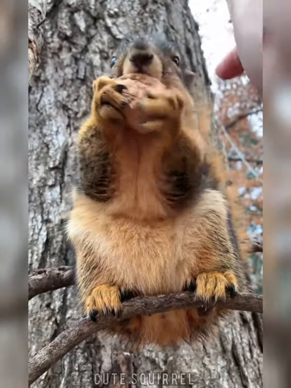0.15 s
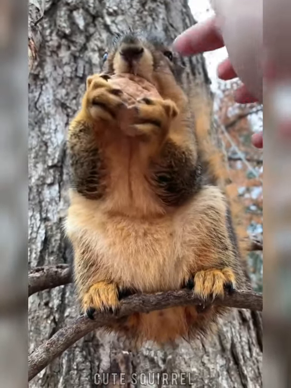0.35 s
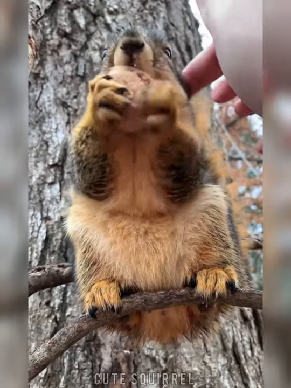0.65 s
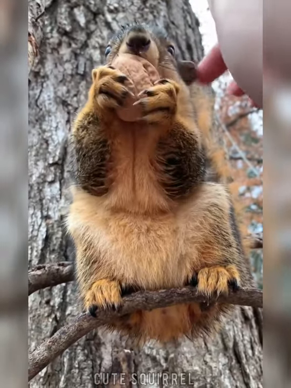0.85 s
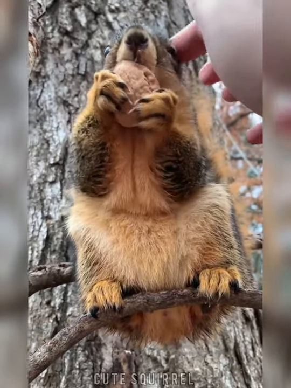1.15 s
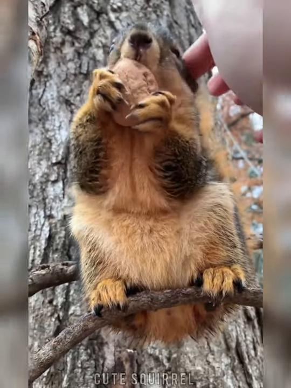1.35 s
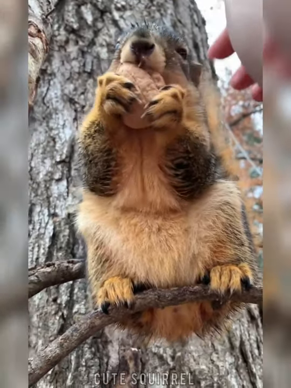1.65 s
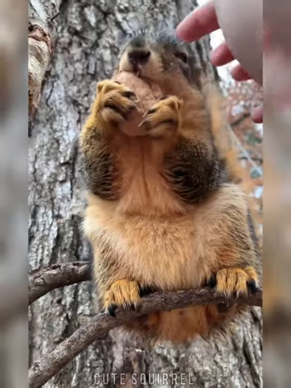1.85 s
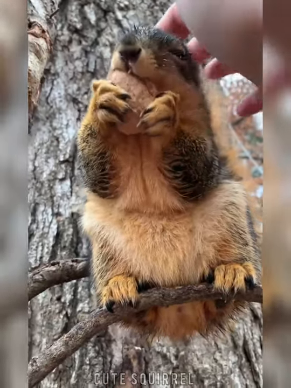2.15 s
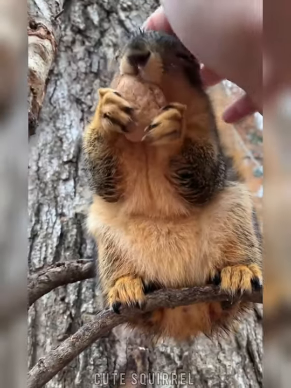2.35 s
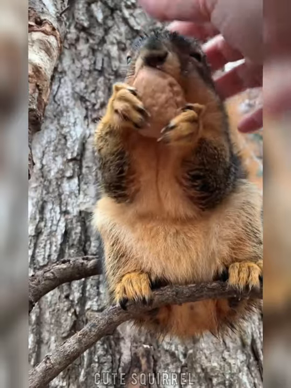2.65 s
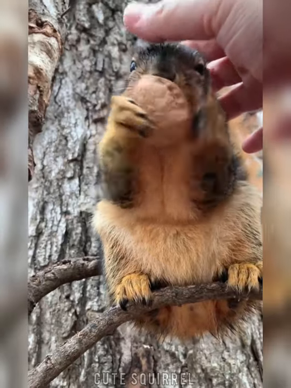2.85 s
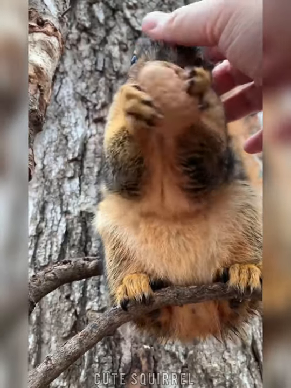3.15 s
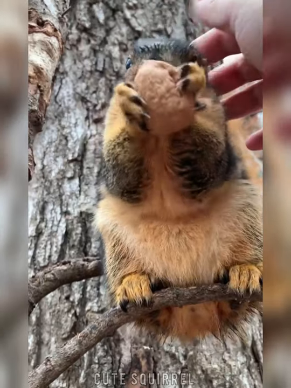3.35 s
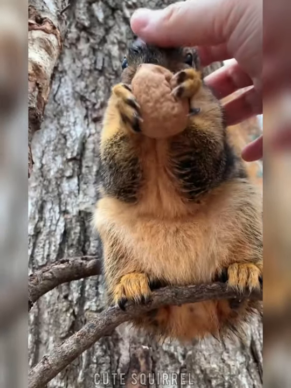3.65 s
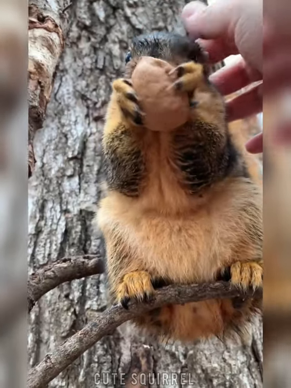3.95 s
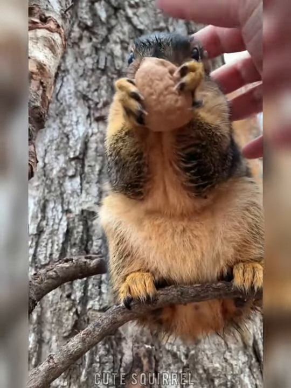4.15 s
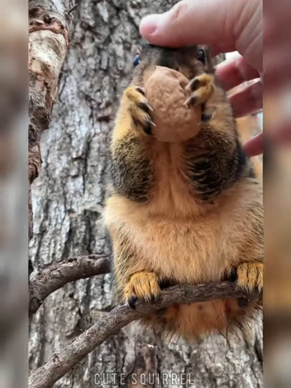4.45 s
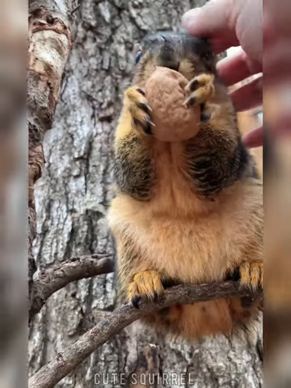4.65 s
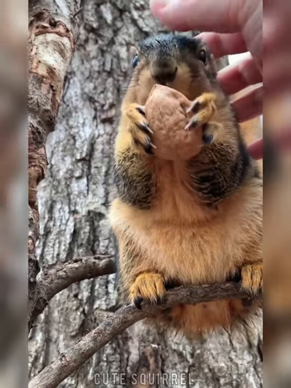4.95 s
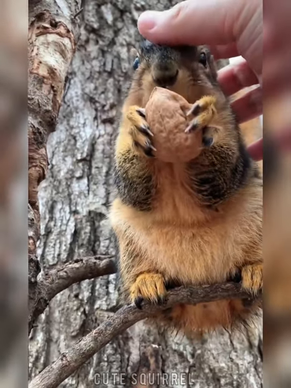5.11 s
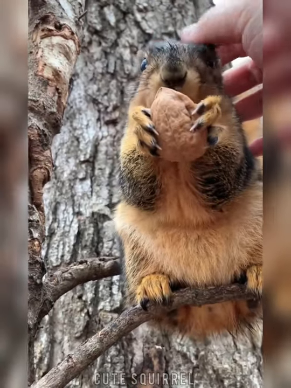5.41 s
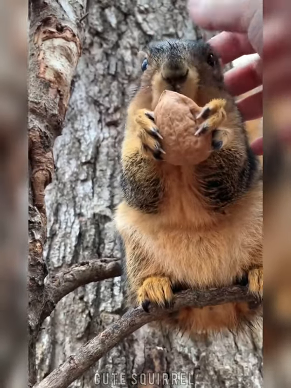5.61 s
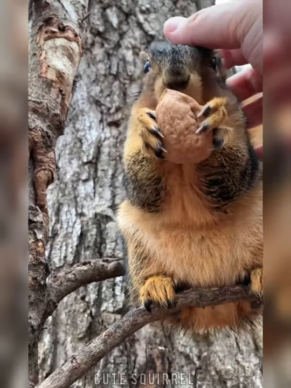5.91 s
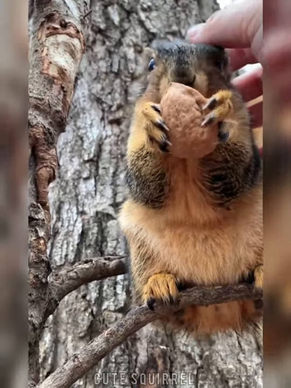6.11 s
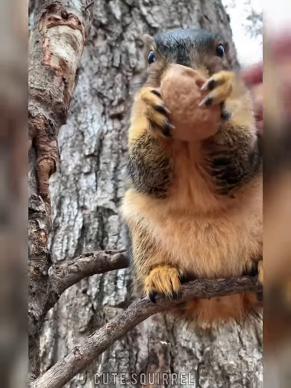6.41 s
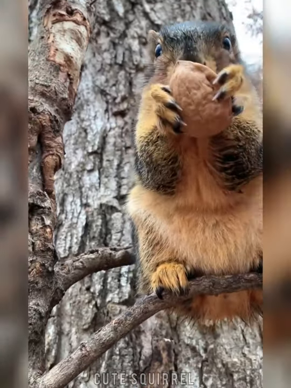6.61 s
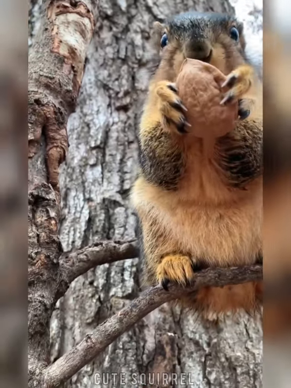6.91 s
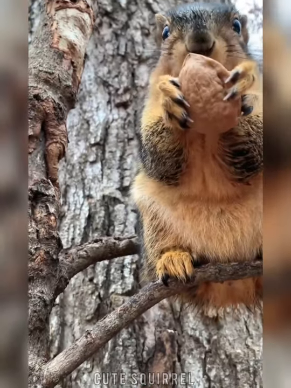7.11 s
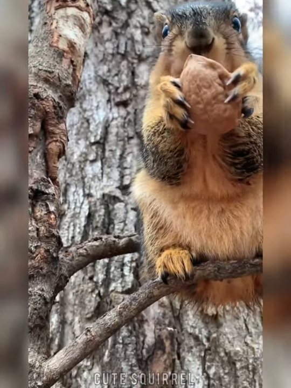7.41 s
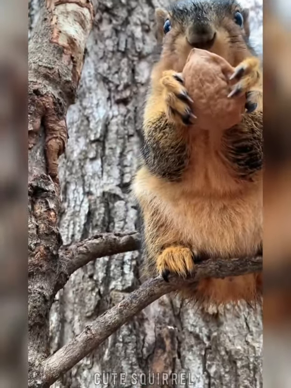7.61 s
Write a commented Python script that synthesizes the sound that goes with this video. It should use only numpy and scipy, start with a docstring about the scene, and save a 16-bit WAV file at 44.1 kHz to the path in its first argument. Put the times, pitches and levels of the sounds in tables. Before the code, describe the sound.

Very close, a squirrel's teeth rasp and knock on a hard walnut shell outdoors. Quick woody taps and scrapes crowd the first two seconds, then bright chips snap, sharpest just after three seconds. Later bites come in sparse clusters with quieter nibbling between them, fading to faint ticks. A low, far traffic rumble runs throughout, swelling slightly near the middle. The sound is dry, with hardly any echo.

```python
"""Teeth grind and nibble close by, over a low rumble like far traffic: a squirrel gnaws a walnut outdoors.
The harder bites knock, scrape and snap off tiny chips. The distant roar swells a little near the middle.
The background is shaped noise. Grinding and scraping are dense random pulses, flakes are short rings,
knocks are decaying sine tones of the shell, and chips are very short bursts of noise."""
import sys
import numpy as np
from scipy import signal
from scipy.fft import rfft, irfft
from scipy.io import wavfile
from scipy.ndimage import uniform_filter1d, map_coordinates

SR = 44100
rng = np.random.default_rng(int(sys.argv[2]) if len(sys.argv) > 2 else 0)


def file_out(sig):
    """Save sig as 16-bit WAV at sys.argv[1]."""
    # one column per channel
    cols = np.atleast_2d(sig).T
    # limit, then scale
    lim = np.clip(cols, -1, 1)
    pcm = np.round(lim * 32767).astype(np.int16)
    wavfile.write(sys.argv[1], SR, pcm)


N = 342688

# spectrum of the distant roar: pitch_hz, level_db (per Hz, relative)
RUMBLE_COLOUR = [(24, -19), (38, -9.5), (52, 1.5), (72, -1), (88, 0.5), (108, -4), (155, -8.5), (205, -16),
                 (265, -12.5), (370, -20), (600, -29.5), (1200, -36.5), (3000, -102)]
# spectrum of the still air: pitch_hz, level_db (per Hz, relative)
AIR_COLOUR = [(150, 2.5), (500, 7), (900, 6), (1300, 0), (2000, -5), (3000, -8.5), (4200, -13), (5200, -46),
              (6600, -20.5), (9000, -20), (11500, -32), (16000, -27)]
# loudness of the far traffic: time_s, level_db
TRAFFIC_LEVEL = [(0, -36.5), (.8, -36), (3.5, -35.5), (3.75, -33), (6.4, -33), (6.95, -32), (7.77, -34)]
# loudness of a faint far whine near the end: time_s, level_db
WHINE_LEVEL = [(6.8, -76), (7.5, -47), (7.77, -57)]
# likeness of the two background channels: pitch_hz, coherence (1 = the same, 0 = unrelated)
LIKENESS = [(110, .99), (350, 0.85), (700, 0.16), (1400, 0.74), (3000, -0.2), (8000, 0.05)]
# background balance: pitch_hz, left_minus_right_db
BALANCE = [(40, -0.5), (90, -1.5), (180, -3), (700, -3), (1400, 0.5), (3000, 0.5), (8000, 0)]
# how hard the teeth grind between strokes: time_s, level_db (relative)
GRIND_LEVEL = [(0, -61), (.15, -47.5), (.4, -59), (.75, -62), (.9, -56.5), (1.9, -49), (2.25, -56.5),
               (2.7, -57.5), (3.4, -64.5), (5.7, -61), (6.5, -56), (6.8, -65)]
# spectrum of the rasping teeth: pitch_hz, level_db (per Hz, relative)
RASP_SPECTRUM = [(400, -24), (1000, -0.5), (2400, 7.5), (4300, 6), (5200, -14), (6600, 6), (8300, -3.5),
                 (10200, -0.5), (11500, -13.5), (13200, 2), (16000, -11)]
# the hardest scraping strokes: middle_s, fizz_level_db (relative), strongest_pitch_hz, length_s
SCRAPES = [(.213, -49, 6200, 0.011), (.336, -49, 14200, 0.022), (.449, -44.5, 12800, 0.02),
           (.502, -50, 6460, 0.023), (.859, -48.5, 9150, 0.022), (1.14, -41.5, 6330, 0.011),
           (1.3, -53.5, 10300, 0.013), (1.355, -48.5, 11200, 0.014), (1.422, -48, 13000, 0.025),
           (1.647, -40, 8040, 0.0084), (2.378, -43.5, 7900, 0.021), (2.513, -44, 12600, 0.05),
           (2.66, -55.5, 13000, 0.031), (2.712, -44.5, 9400, .013), (2.775, -52, 14000, 0.037),
           (3.212, -37, 10900, 0.014), (3.266, -44, 8800, 0.019), (4.008, -48.5, 10400, 0.008),
           (4.229, -50.5, 7500, 0.029), (4.573, -48, 7300, 0.019), (4.731, -38, 11300, 0.027),
           (5.342, -48, 13600, 0.012), (5.427, -49.5, 10000, 0.0096), (5.58, -54, 13800, 0.013),
           (5.642, -50, 13600, 0.0085), (5.905, -46, 11700, 0.011), (6.047, -50.5, 10900, 0.014),
           (6.391, -47, 11700, 0.011), (6.437, -45.5, 11000, 0.019), (6.54, -46, 8200, 0.076),
           (6.757, -44, 14800, 0.01), (7.068, -51.5, 14000, 0.02), (7.452, -60, 14000, 0.011),
           (7.55, -59, 13700, 0.011)]
# extra ringing tones of the shell: pitch_hz, level_db (against its main ring)
SHELL_MODES = [(1700, -2.5), (2650, -3), (3700, -7)]
# the hardest knocks of teeth on the shell: start_s, level_db (relative), ring_pitch_hz
TOOTH_KNOCKS = [(.1132, -36.5, 2140), (.1445, -33, 2130), (.2008, -29.5, 2000), (.4277, -35, 2050),
                (.852, -33, 2400), (.8656, -28, 2020), (.9225, -36, 2680), (.9941, -30, 2300),
                (1.1225, -32, 2470), (1.148, -31, 2400), (1.3443, -35, 2300), (1.4032, -31.5, 1990),
                (1.4913, -24.5, 2460), (1.8423, -28.5, 2500), (2.11, -28, 2300), (2.1254, -33.5, 1870),
                (4.2048, -27.5, 2200), (5.2749, -35.5, 2380), (5.4251, -35.5, 1830), (6.541, -31, 2010),
                (6.768, -31.5, 1820)]
# spectrum of a breaking chip: pitch_hz, level_db (per Hz, relative)
CHIP_SPECTRUM = [(500, -99), (1600, -2), (2600, 17), (5000, 8), (7000, 13.5), (16000, 11)]
# chips snapping off: start_s, level_db (relative), strongest_pitch_hz, decay_s
CHIP_SNAPS = [(0.3214, -29.5, 6840, 0.0012), (.453, -30, 6600, 0.0021), (1.1458, -17, 6250, 0.0028),
              (1.151, -17.5, 7500, 0.00057), (1.1833, -21.5, 6900, 0.0029), (1.274, -24.5, 10200, 0.0032),
              (1.4422, -26, 7090, 0.0015), (1.6426, -23, 7600, 0.00053), (1.6819, -14.5, 8200, 0.0021),
              (2.3384, -24.5, 6900, 0.003), (2.456, -30, 7240, .0006), (2.522, -17, 9900, 0.00046),
              (2.874, -23.5, 9100, 0.001), (2.985, -23, 9400, 0.0035), (3.0815, -8, 6670, 0.0022),
              (3.0808, -7.5, 10200, 0.0025), (3.2188, -8.5, 12200, 0.0016), (3.2294, -17.5, 4770, 0.0023),
              (4.2068, -21.5, 8450, 0.0017), (4.205, -25, 3800, 0.00097), (4.3138, -27.5, 8000, 0.00091),
              (4.933, -35.5, 7000, .0025), (6.212, -29, 10900, 0.0033), (6.3007, -21, 14200, 0.0015),
              (6.393, -24, 12300, 0.0011), (6.434, -30, 10400, .0006), (6.521, -30, 7040, .0006),
              (6.5427, -22, 7500, 0.0013), (6.743, -31, 3660, 0.0017), (7.062, -33, 3730, 0.0052)]

AIR_DB = -46
# flakes: how many, how far the largest stand above the grind level, and their range of pitch
TICKS_PER_S, TICK_DB, TICK_HZ = 70, 19, (3500, 11000)
# how far the extra shell tones vary from blow to blow, in pitch (share) and strength
DETUNE, STRENGTH_DB = .1, 4
# the first spike of a crack, against the burst that follows it
SNAP_DB = 18
# unevenness of a stroke, and how often it changes
JUDDER_DB, JUDDER_PER_S = 3, 160
# upper limit of the sound
EDGE_HZ = 15950


def amp(db):
    """Turns decibels into a gain."""
    return 10 ** (np.asarray(db) / 20)


def unit(x):
    """Scales a sound to an average (rms) strength of 1."""
    return x / np.sqrt(np.mean(x ** 2) + 1e-20)


def read(points, hz):
    """Reads a spectrum table between its points, on a logarithmic pitch axis."""
    f, value = np.transpose(points)
    return np.interp(np.log(hz + 1), np.log(f + 1), value)


def read_at(curve, s):
    """Reads a time table at time s."""
    return np.interp(s, *np.transpose(curve))


def follow(curve):
    """Reads a time table at every sample."""
    return read_at(curve, np.arange(N) / SR)


def add(mix, s, sound):
    """Adds a stereo sound at time s, cut off at the ends of the mix."""
    at = round(s * SR)
    sound = sound[:, max(-at, 0):]
    part = mix[:, max(at, 0):][:, :sound.shape[1]]
    part += sound[:, :part.shape[1]]


def wander(length, per_s):
    """Makes a smooth random motion of rms 1 by joining random points."""
    knots = np.arange(length) * per_s / SR
    return unit(map_coordinates(rng.standard_normal(length // 20 + 2), [knots], mode="wrap"))


def drift(x, patchy_db=4.0):
    """Fades narrow patches of the spectrum in and out at random."""
    z = signal.stft(x, nperseg=2048)[2]
    patches = rng.standard_normal(z.shape[1:])
    patches = uniform_filter1d(patches, size=3, axis=0)  # smooth over pitch
    patches = unit(uniform_filter1d(patches, size=4, axis=1))  # smooth over time
    gain = amp(patchy_db * np.minimum(patches, 2))
    return unit(signal.istft(z * gain, nperseg=2048)[1][:, :N])


def ring(colour, hz=1000, lift_db=0, width_hz=1000, skirt_db=0, size=1024):
    """Short response with a given spectrum and one resonance, falling skirt_db in an octave either side."""
    f = abs(np.fft.fftfreq(size, 1 / SR))
    peak_db = lift_db / (1 + (2 * (f - hz) / width_hz) ** 2)
    peak_db -= skirt_db * np.minimum(abs(np.log2((f + 1) / hz)), 1)
    log_gain = np.log(amp(read(colour, f) + peak_db))
    # this phase makes the response start at once, with no sound ahead of it
    spectrum = np.exp(np.conj(signal.hilbert(log_gain)))
    return np.fft.ifft(spectrum).real[None, :size // 2]


def diffuse(colour):
    """Noise from all around: the two channels are nearly alike in the bass, less so in most higher bands."""
    hz = np.fft.rfftfreq(N, 1 / SR)
    a, b = rfft(rng.standard_normal((2, N)))
    same, tilt_db = np.clip(read(LIKENESS, hz), -1, 1), read(BALANCE, hz)
    left = a * amp(tilt_db / 2)
    right = (same * a + np.sqrt(1 - same ** 2) * b) * amp(-tilt_db / 2)
    return unit(irfft(np.array([left, right]) * amp(read(colour, hz)), N))


def outdoors(rumble_db=0, air_share=0.76, whine_hz=1200):
    """Far traffic as shaped noise: a rumble, a wash that follows it in part, and a narrow whine."""
    level_db = follow(TRAFFIC_LEVEL)
    rumble = diffuse(RUMBLE_COLOUR) * amp(level_db + rumble_db)
    wash = drift(diffuse(AIR_COLOUR)) * amp(AIR_DB + air_share * (level_db - level_db.mean()))
    whine_colour = [(whine_hz / 2, -60), (whine_hz * 0.83, -14), (whine_hz, 0),
                    (whine_hz * 1.25, -14), (whine_hz * 2, -60)]
    whine = diffuse(whine_colour)
    return rumble + wash + whine * amp(follow(WHINE_LEVEL))


def scatter(x, wet_db=-22, t60=0.15):
    """Trunk, branches and hand throw back a faint short tail of sparse random echoes."""
    t = np.arange(SR // 4) / SR
    taps = rng.standard_normal((2, len(t))) * (rng.random((2, len(t))) < 1 / 10)
    taps *= amp(-60 * t / t60) * (t > .002)
    return x + amp(wet_db) * signal.fftconvolve(x, taps / np.linalg.norm(taps[0]), axes=1)[:, :N]


def early_echoes(sound, echo=0.76, reach_s=0.0015, count=4):
    """A few very early random echoes colour each scrape and flake differently."""
    taps = np.zeros(256)
    wait, sign = rng.uniform(.15, 1, count), rng.choice([-1, 1], count)
    taps[np.minimum(wait * reach_s * SR, len(taps) - 1).astype(int)] = echo * sign
    taps[0] = 1  # the direct sound
    return signal.fftconvolve(sound, taps[None] / np.linalg.norm(taps))


def shell(hz, main_t60=0.009, side_t60=0.0091, lag_s=.00007, left_db=-3.0):
    """One blow rings the nut's fading tones; side tones vary each time. Left is earlier but softer."""
    t = np.maximum(np.arange(SR // 20) / SR - np.array([[0], [lag_s]]), 0)
    modes = amp(-60 * t / main_t60) * np.sin(2 * np.pi * hz * t)
    variation = rng.uniform(-1.18, 1, (len(SHELL_MODES), 2))
    for (f, db), (shift, force) in zip(SHELL_MODES, variation):
        level = amp(db + STRENGTH_DB * force - 60 * t / side_t60)
        modes += level * np.sin(2 * np.pi * f * (1 + DETUNE * shift) * t)
    modes *= 1 - np.exp(-t / 0.00046)  # soft start
    return modes / abs(modes).max() * amp([[left_db], [0]])


def slips(size, per_s, spread_db, shared=0.44):
    """Stick-slip: dense tiny fractures of uneven size, partly common to both channels."""
    pulses = (rng.random((3, size)) < per_s / SR) * rng.standard_normal((3, size))
    pulses *= amp(spread_db * np.minimum(rng.exponential(1, (3, size)), 4))
    return unit(pulses[:2] + shared * pulses[2])


def grit(size, per_s, hz, count=3):
    """Coarse crumbs give way one by one and ring the shell at a few spots."""
    pulses = (rng.random((count, size)) < per_s / count / SR) * rng.standard_normal((count, size))
    return unit(sum(signal.oaconvolve(spot[None], shell(hz), axes=1)[:, :size] for spot in pulses))


def grinding(fizz_db=-7, grit_db=-1, grit_per_s=900, uneven_db=4, uneven_per_s=45):
    """Between strokes the teeth keep working unevenly: fine fractures fizz and coarse crumbs ring."""
    rasp = ring(RASP_SPECTRUM, 6600, skirt_db=10)
    fizz = unit(signal.oaconvolve(slips(N, 1500, 3), rasp)[:, :N])
    gnawing = amp(fizz_db) * drift(fizz) + amp(grit_db) * grit(N, grit_per_s, 2048)
    return gnawing * amp(follow(GRIND_LEVEL) + uneven_db * wander(N, uneven_per_s))


def ticks():
    """Tiny flakes break off while the teeth grind, each a short ring with its own size and pitch."""
    out = np.zeros((2, N))
    for when, force, spot in rng.random((round(TICKS_PER_S * N / SR), 3)):
        s, hz = when * N / SR, np.interp(spot, [0, 1], TICK_HZ)
        tick = early_echoes(ring(RASP_SPECTRUM, hz, 7.3, hz / 2))
        level_db = read_at(GRIND_LEVEL, s) + TICK_DB * force
        add(out, s, amp(level_db) * tick / np.linalg.norm(tick))
    return out


def strokes(rows, stroke_db=0.0, slips_per_s=1300, spread_db=4.0, lift_db=4, width_share=.3, skirt_db=6,
            fall_share=1.04, crumbs_db=25, crumbs_per_s=450, crumbs_hz=3200, size=8192):
    """Each stroke builds and judders away: a fine fizz from the tooth's edge and crumbs that ring the shell."""
    out, t = np.zeros((2, N)), (np.arange(size) - size / 2) / SR
    for s, db, hz, length in rows:
        press = np.hanning(size) / (1 + (t / (length * np.where(t < 0, 1, fall_share))) ** 2)
        colour = ring(RASP_SPECTRUM, hz, lift_db, width_share * hz, skirt_db)

        def fizz_at_spot():
            """Fractures at one spot, with that spot's own early echoes."""
            rasp = signal.fftconvolve(slips(size, slips_per_s, spread_db), colour)
            return unit(early_echoes(rasp)[:, :size])

        # the colour shifts as the tooth slides from one spot to the next
        first, last = fizz_at_spot(), fizz_at_spot()
        slide = np.clip(.5 + t / length / 2, 0, 1)
        fizz = np.sqrt(1 - slide) * first + np.sqrt(slide) * last
        # crumbs follow how hard the teeth grind, and grow half as fast as the fizz in dB
        crumbs_level = amp(crumbs_db + db / 2 + read_at(GRIND_LEVEL, s))
        crumbs = grit(size, crumbs_per_s, crumbs_hz) * crumbs_level
        judder = amp(JUDDER_DB * wander(size, JUDDER_PER_S))
        add(out, s + t[0], judder * press * (amp(db + stroke_db) * fizz + crumbs))
    return out


def knocks(rows, knock_db=1, delay_s=0.00067, chatter_db=-7, chatter_s=0.013, count=3):
    """A tooth lands on the shell and catches again a few times, more lightly the later it comes."""
    out = np.zeros((2, N))
    for s, db, hz in rows:
        add(out, s + delay_s, amp(db + knock_db) * shell(hz))
        for late in rng.random(count) ** 2:
            add(out, s + delay_s + chatter_s * late, amp(db + chatter_db * late) * shell(hz))
    return out


def chips(chip_db=-12.5, lift_db=10, width_share=0.14, skirt_db=7, shared=0.19, rise_s=0.00035,
          around_db=-19, around_s=0.0091, size=1800):
    """A crack opens abruptly and dies within milliseconds, over a weak burst of random pulses centred on it."""
    out, t = np.zeros((2, N)), (np.arange(size) - size / 2) / SR
    for s, db, hz, fall_s in CHIP_SNAPS:
        draw = rng.standard_normal((3, size))
        burst = (draw[:2] + shared * draw[2]) * 2 / (np.exp(-t / rise_s) + np.exp(t / fall_s))
        # the weak, dense pulses around the crack
        burst += slips(size, 2700, 1.1) * amp(around_db) * np.exp(-abs(t) / around_s)
        # the first spike, up to two samples later on the right
        burst[[0, 1], size // 2 + np.array([0, rng.integers(3)])] += amp(SNAP_DB)
        colour = ring(CHIP_SPECTRUM, hz, lift_db, width_share * hz, skirt_db)
        snap = signal.fftconvolve(burst, colour / np.linalg.norm(colour))
        add(out, s + t[0], amp(db + chip_db) * snap)
    return out


def scene():
    """The gnawing in front of the outdoor background."""
    background = outdoors() + grinding()
    bites = chips() + knocks(TOOTH_KNOCKS) + strokes(SCRAPES) + ticks()
    return background + scatter(bites)


def record(dry):
    """A steep low-pass filter takes away the sound above the upper limit."""
    low_pass = signal.firwin(511, EDGE_HZ, window=("kaiser", 9), fs=SR)
    return signal.oaconvolve(dry, low_pass[None], "same")


dry = scene()
out = record(dry)
file_out(out)
```